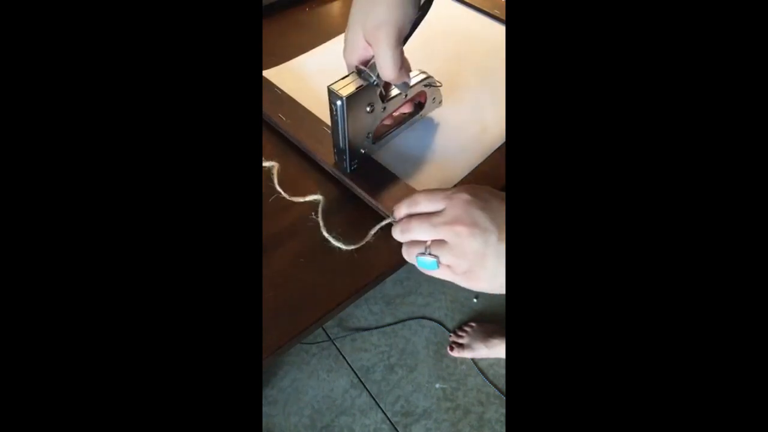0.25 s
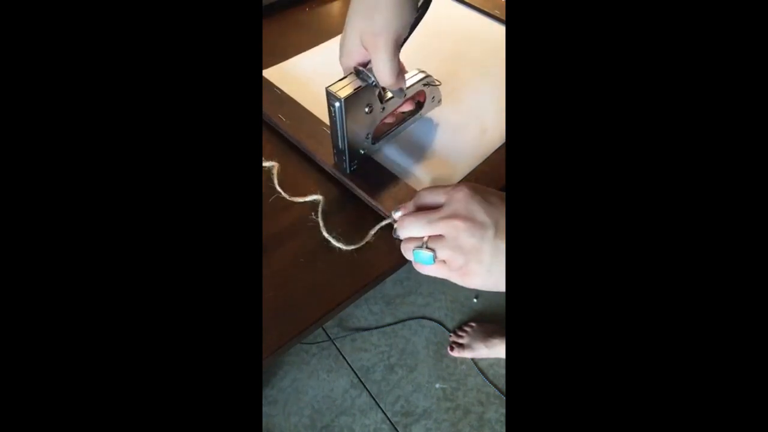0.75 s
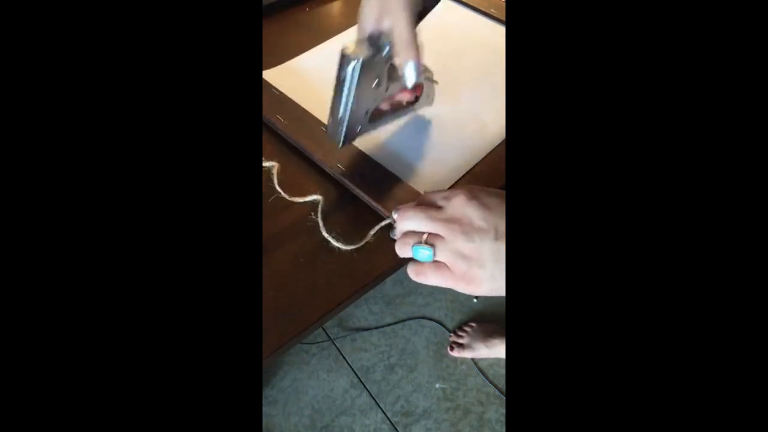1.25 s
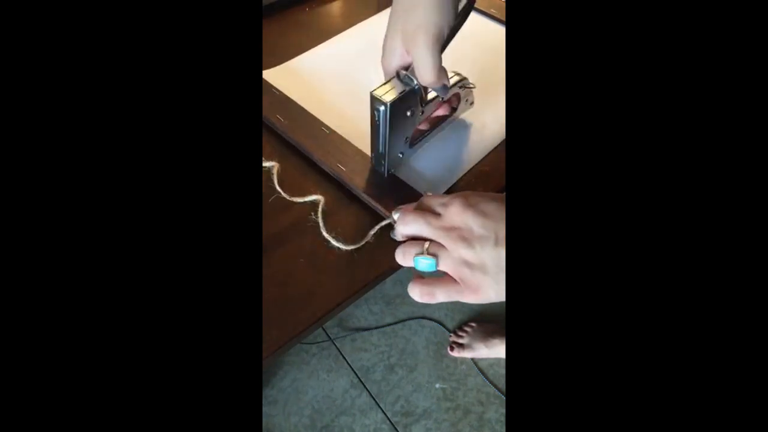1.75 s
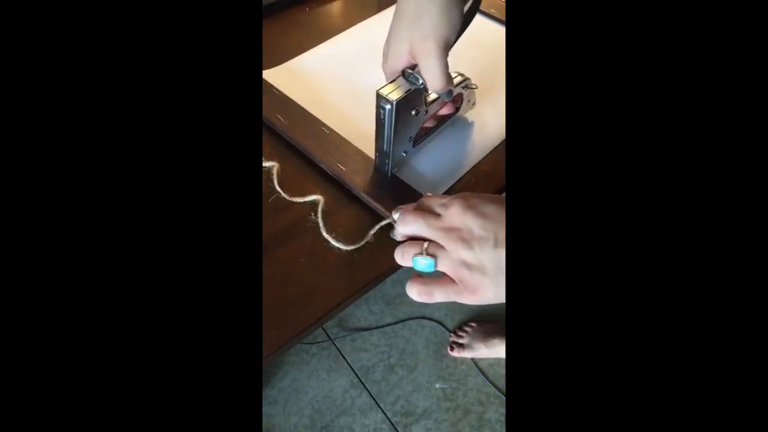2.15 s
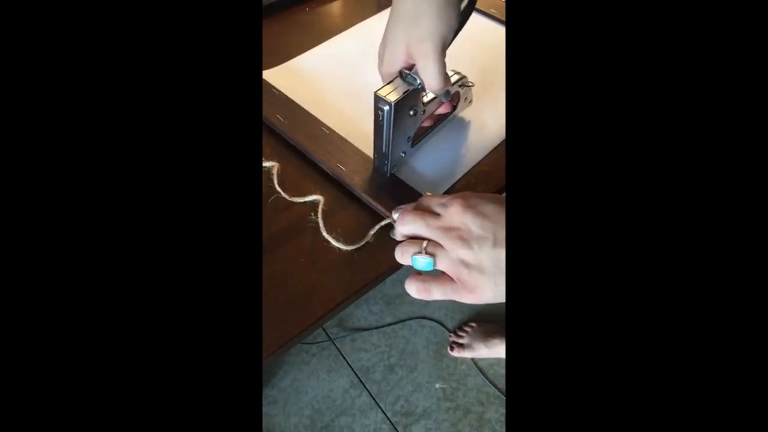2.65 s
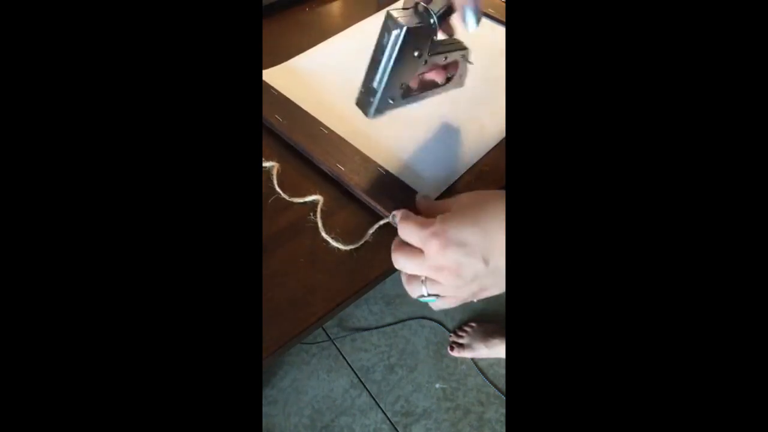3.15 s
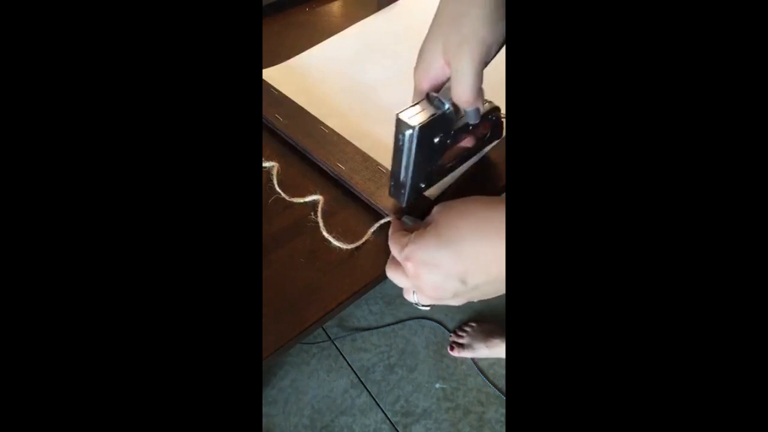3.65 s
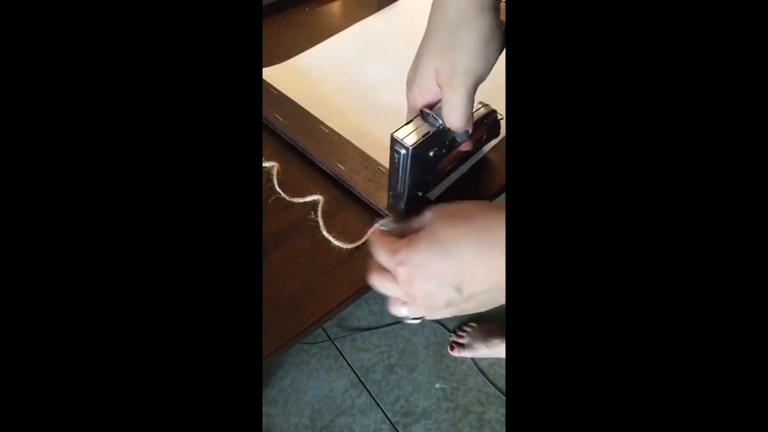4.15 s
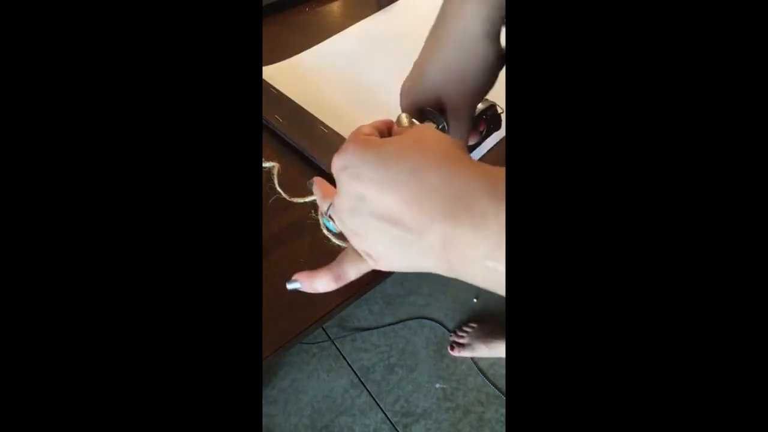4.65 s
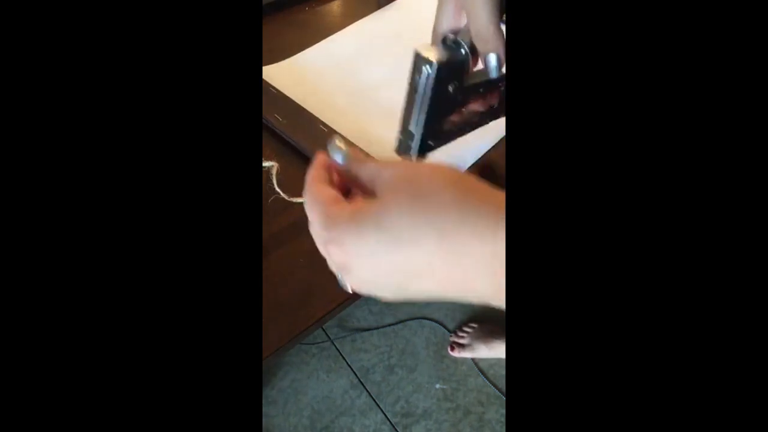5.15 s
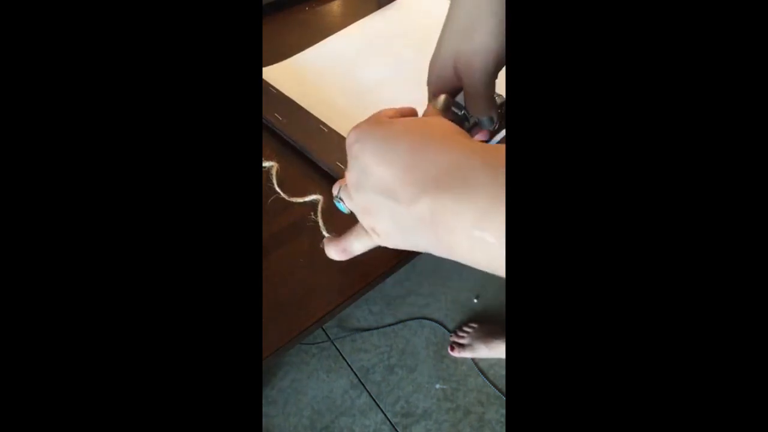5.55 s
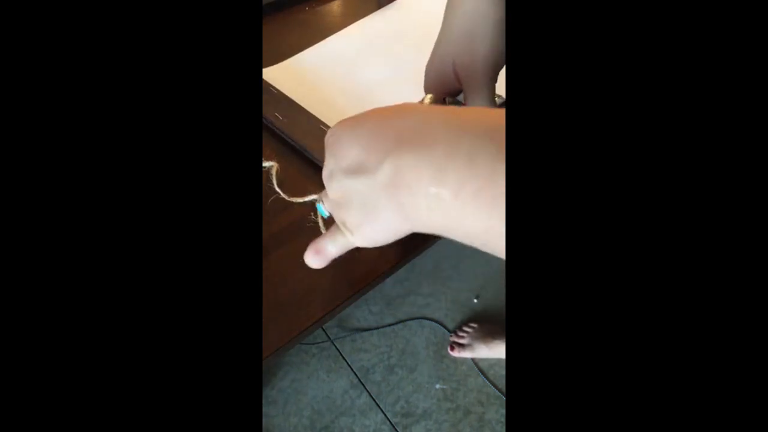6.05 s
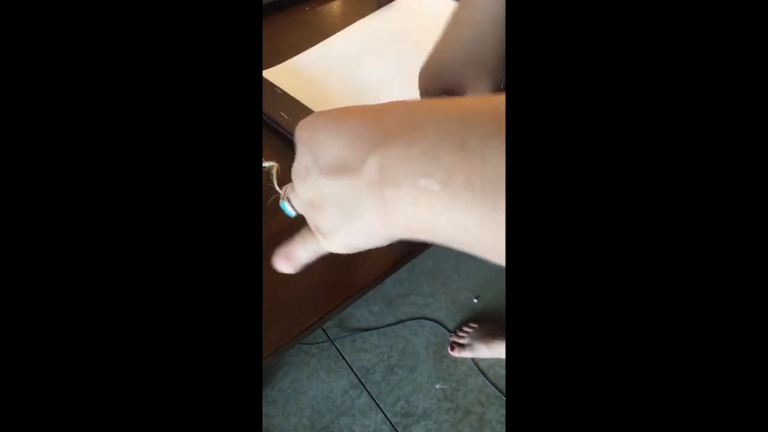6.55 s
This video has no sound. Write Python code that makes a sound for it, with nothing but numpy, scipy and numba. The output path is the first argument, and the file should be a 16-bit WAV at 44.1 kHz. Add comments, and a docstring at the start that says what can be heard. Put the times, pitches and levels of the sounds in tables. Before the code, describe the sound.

Close up in a quiet room, a squeezed staple gun ticks twice, then cracks a staple into a wooden frame, its lever clacking back afterwards. This happens three times, about two seconds apart, with soft rubs and light nose taps between. The last shot thuds heavily through the table. A short room echo follows each, over faint motor drone and passing traffic outside. A phone microphone dips after the loud shots.

```python
"""Staple gun fired three times into a wooden frame

A hand squeezes the gun: the lever ticks twice before each shot and clacks back after it.
Steel contacts are chattering noise bursts plus body modes; knocks ring the wood, the table thuds.
Spring twangs, rubs, faint treble ticks, a diffuse room echo and a coloured echo tail join them.
Outside, a motor drones as swelling harmonics over noise: traffic rush and still house air.
The close phone turns its gain down after loud sound.
"""
import sys
import numpy as np
from scipy import signal
from scipy.fft import rfft, irfft
from scipy.io import wavfile
from scipy.ndimage import uniform_filter1d
from numba import njit

SR = 44100
rng = np.random.default_rng(int(sys.argv[2]) if len(sys.argv) > 2 else 0)


def master_out(mix):
    """Clip the mix to full scale and print it as 16-bit PCM to the path in sys.argv[1]."""
    frames = np.transpose(np.atleast_2d(mix))
    ceiling = np.clip(frames, -1, 1)
    pcm = np.round(ceiling * 32767).astype(np.int16)
    wavfile.write(sys.argv[1], SR, pcm)


N = 300321
T = np.arange(N) / SR


def undb(db):
    """Gain from dB."""
    return 10 ** (np.asarray(db) / 20)


def decay(u_s, t60_s):
    """Exponential amplitude decay, 60 dB down at t60_s."""
    return np.exp(-np.log(1000) * u_s / t60_s)


def band(x, lo_hz, hi_hz):
    """Butterworth band-pass."""
    sos = signal.butter(2, [lo_hz, min(hi_hz, .45 * SR)], "band", fs=SR, output="sos")
    return signal.sosfilt(sos, x)


def ring(x, modes):
    """Sum of decaying resonances, each scaled so that a burst of noise keeps its size."""
    out = 0
    for hz, db, t60_s in modes:
        pole = np.exp(2j * np.pi * hz / SR - np.log(1000) / (t60_s * SR))
        gain = undb(db) * np.sqrt(1 - abs(pole) ** 2)
        out = out + gain * signal.lfilter([1], [1, -pole], x).imag
    return out


def walk(rate_hz):
    """Random levels held 1 / rate_hz and slewed twice; spread near 1."""
    hold = int(SR / rate_hz)
    steps = np.repeat(rng.standard_normal(N // hold + 1), hold)
    return 1.3 * uniform_filter1d(uniform_filter1d(steps, hold), hold)[:N]


def contact(kind, start_s, mid_db, hold_ms, extra_treble_db=0):
    """One steel contact: band levels and frame knock follow from its kind and strength."""
    low_db, treble_db, knock_db, rise_ms, top_db = kind
    high_db = mid_db + treble_db + extra_treble_db
    return (start_s, mid_db + low_db, mid_db, high_db, high_db + top_db,
            rise_ms, hold_ms, mid_db + knock_db)


def rattle(start_s, rise_ms, hold_ms):
    """Envelope of steel parts chattering together: exponential rise, then a rounded fall."""
    u_ms = (T - start_s) * 1000
    return np.exp(np.where(u_ms < 0, u_ms / rise_ms, -(np.minimum(u_ms / hold_ms, 8)) ** 2))


def steel(hits):
    """Colliding steel: a broad noise crack in four bands plus the ring of the gun body."""
    # gun body modes: pitch_hz, level_db, t60_s
    body_modes = [(1986, -7, .016), (2445, -3, 0.013), (3034, -7.5, 0.015), (3540, -8.5, 0.02),
                  (4504, -1.5, 0.0053), (5880, -8, .014), (9612, -2.5, 0.002), (11600, -2, 0.0051),
                  (3290, -18, .2), (3390, -18.5, .16), (4090, -17, .18), (4410, -17.5, .2),
                  (4640, -18.5, .16)]
    ring_db = -11
    # hits: start_s, low_db, mid_db, high_db, top_db, rise_ms, hold_ms
    low, mid, high, top = sum(np.outer(undb(hit[1:5]), rattle(hit[0], *hit[5:])) for hit in hits)
    contacts = rng.standard_normal((3, N)) * undb(2.3 * walk(900))
    crack = 3 * band(low * contacts[0], 1250, 2500)
    crack = crack + 2.3 * band(band(mid * contacts[1], 2300, 5400), 2300, 5400)
    crack = crack + 1.8 * band(high * contacts[2], 5200, 9500)
    crack = crack + 1.6 * band(top * contacts[2], 9500, 14000)
    return crack + undb(ring_db) * ring(crack, body_modes)


def wood(knocks, thuds):
    """Short smooth pushes ring the frame; the table swings as a decaying sine gliding down."""
    # frame modes: pitch_hz, level_db, t60_s
    frame_modes = [(140, -15, .08), (275, -5, 0.045), (374, -11, 0.051), (518.5, -8.5, .07),
                   (750, -9.5, .06), (980, -9, 0.029)]
    push_ms = .9
    thud_t60_s, thud_lag_ms, glide_rad, glide_s = .095, 2., 3.4, .0065

    push = np.zeros(N)
    for start_s, db in knocks:
        push[int(start_s * SR)] += undb(db)
    size = int(push_ms * SR / 1000) + 2
    smooth_push = signal.lfilter(np.hanning(size) / size, [1], push)
    out = ring(smooth_push * 60, frame_modes)

    for start_s, db, hz in thuds:
        u = np.maximum(T - start_s - thud_lag_ms / 1000, 0)
        phase = 2 * np.pi * hz * u + glide_rad * (1 - np.exp(-u / glide_s))
        out = out - undb(db) * np.sin(phase) * decay(u, thud_t60_s)
    return out


def spring():
    """One low mode of the spring, swelling over a few cycles before it dies."""
    # drive spring as the latch slips, handle as it is set down: start_s, level_db
    twangs = [(1.568, -26), (3.417, -27.5), (5.292, -18.5), (5.527, -29.5), (5.649, -25.5), (6.118, -41.5)]
    pitch_hz, t60_s, swell_s = 984, 0.046, 0.0019
    out = 0
    for start_s, db in twangs:
        u = np.maximum(T - start_s, 0)
        envelope = (1 - np.exp(-u / swell_s)) * decay(u, t60_s)
        out = out + undb(db) * envelope * np.sin(2 * np.pi * pitch_hz * u)
    return out


def rubs_and_ticks():
    """Rubs and faint treble ticks: short swells of grit with one bright band each."""
    # rubs and ticks: middle_s, length_ms, level_db, bright_hz
    swells = [(1.11, 22, -75, 8000), (1.344, 24.7, -72, 8000), (1.54, 123, -54.5, 3500),
              (2.699, 100, -53.5, 6100), (3.385, 84, -55, 3300), (3.935, 78, -60, 3700),
              (5.225, 80, -61, 3500), (6.47, 39, -72, 8000)]
    treble_db, bright_db = -9.5, -4.5  # against the broad grit
    grit = rng.standard_normal(N) * undb(3.9 * walk(140))
    broad = band(band(grit, 2200, 8000), 2200, 8000) + undb(treble_db) * band(grit, 6300, 11000)
    out = 0
    for middle_s, length_ms, db, hz in swells:
        swell = np.cos(np.pi * np.clip((T - middle_s) * 1000 / length_ms, -.5, .5)).clip(0)
        bright = band(grit, hz * .93, hz * 1.07)
        out = out + swell * undb(db) * (2 * broad + 5 * undb(bright_db) * bright)
    return out


def room(x):
    """Diffuse echo: each narrow band stores received energy and lets it fade, fast then slowly."""
    # echo by band, late part from the rest of the house: pitch_hz, early_t60_s, early_db, late_db
    echo = [(200, .25, -23, -42.5), (580, 0.15, -5.5, -24.5), (1510, 0.35, -10, -26.5),
            (3500, 0.26, -17, -21.5), (6950, 0.22, -16, -26), (14000, .25, -16, -28)]
    rise_ms, late_t60_s = 6., 0.68
    hz, *columns = np.transpose(echo)
    rise = np.exp(-1000 / (rise_ms * SR))
    late_fade = 10 ** (-6 / (late_t60_s * SR))
    out = 0
    for centre_hz in 160 * 2 ** np.arange(0, 6.7, 1 / 5):
        edges_hz = centre_hz / 2 ** (1 / 10), centre_hz * 2 ** (1 / 10)
        t60_s, early_db, late_db = (np.interp(np.log(centre_hz), np.log(hz), c) for c in columns)
        early_fade = 10 ** (-6 / (t60_s * SR))
        arriving = signal.lfilter([1 - rise], [1, -rise], band(x, *edges_hz) ** 2)
        energy = 0
        for db, fade in ((early_db, early_fade), (late_db, late_fade)):
            energy = energy + undb(2 * db) * signal.lfilter([1 - fade], [1, -fade], arriving)
        scatter = band(rng.standard_normal(N), *edges_hz)
        out = out + np.sqrt(np.abs(energy)) * scatter / np.std(scatter)
    return out


def coloured_tail(x):
    """The room's fading tail, tinted by each sound: convolution with decaying noise."""
    level_db, t60_s = -21.5, 0.29
    noise = band(rng.standard_normal(SR // 2), 1200, 10000)
    tail = noise * decay(T[:SR // 2], t60_s)
    return undb(level_db) * signal.fftconvolve(x, tail / np.sqrt(np.sum(tail ** 2)))[:N]


def coloured(points, flicker_db):
    """Noise of a given spectrum, rms 1 between 500 and 2500 Hz before its level flickers."""
    hz, db = np.transpose(points)
    f = np.maximum(np.arange(N // 2 + 1) * SR / N, 1)
    spectrum = rfft(rng.standard_normal(N)) * undb(np.interp(np.log(f), np.log(hz), db))
    mid = irfft(spectrum * ((f > 500) & (f < 2500)), N)
    return irfft(spectrum, N) / np.std(mid) * undb(flicker_db * walk(9))


def outside():
    """Motor harmonics swell in turn and waver; traffic noise swells over the still house air."""
    # motor and traffic course: start_s, firing_rate_hz, motor_db, rush_db
    course = [(0.0, 56.16, -10.5, -63), (0.41, 54, -4, -61), (0.69, 54.7, -12, -62.5),
              (0.96, 54.9, 0.3, -61), (1.5, 55.17, 5.5, -58.5), (2.3, 56.08, 1.5, -56),
              (2.6, 55.55, -0.6, -55.5), (2.85, 56.08, -2.7, -50.5), (3.2, 55.8, -0.3, -46),
              (3.6, 55.83, 0, -47), (4.07, 55.8, 3, -48), (4.58, 55.02, 1.9, -54),
              (5.2, 54.92, -0.9, -56.5), (5.75, 54.53, -20.5, -59), (6.05, 54.4, -6, -52.5),
              (6.35, 53.4, -11, -56.5), (6.8, 53.6, -7.5, -60.5)]
    # firing-rate multiples, each strongest for a while:
    # peak_db, from_s, until_s, rise_db_per_s, fall_db_per_s, rest_db
    multiples = [(-45.5, 3.9, 17, 6, 3, -61.5), (-39, 2.1, 4.9, 32.5, 13.5, -46),
                 (-46.5, 2.5, 4.05, 36, 40, -58.5), (-36.5, 2.9, 4.01, 16.5, 34, -50),
                 (-49, 2.1, 2.7, 28.5, 28, -59)]
    # relative spectra: pitch_hz, density_db_per_hz
    rush_spectrum = [(26, -25), (45, -22.5), (104, -3), (129, -6), (162, -9.5), (222, -6.5), (411, -15.5),
                     (465, -22.5), (760, -19.5), (1100, -22), (1550, -20), (1890, -23.5), (3080, -34.5),
                     (13500, -65.5), (16000, -94.5)]
    air_spectrum = [(18, -39), (30, 2.5), (115, -2), (384, -6.5), (461, -3.5), (760, -19.5), (913, -10.5),
                    (1630, -21.5), (2980, -29.5), (13700, -47.5), (16000, -55)]
    # tyre roar: pitch_hz, width_hz, level_db
    roar_peaks = [(614, 210, -10.5), (1197, 500, -5), (2004, 840, -5.5), (2960, 2000, -14)]
    air_db, low_cut_hz = -60.5, 44

    start_s, *columns = np.transpose(course)
    firing_hz, motor_db, rush_db = (np.interp(T, start_s, c) for c in columns)
    phase = 2 * np.pi * np.cumsum(firing_hz) / SR
    drone = 0
    for k, (db, from_s, until_s, rise, fall, rest_db) in enumerate(multiples, start=1):
        swell_db = db + np.minimum(rise * (T - from_s), fall * (until_s - T))
        swell_db = np.clip(swell_db, min(rest_db, db), db)
        waver_db = 2.2 * walk(4) + 0.75 * walk(12)
        drone = drone + undb(swell_db + waver_db) * np.sin(k * phase + 0.11 * walk(35))

    rush = undb(rush_db) * coloured(rush_spectrum, flicker_db=0.98)
    roar = 0
    for hz, width_hz, db in roar_peaks:
        peak = band(rush, hz - width_hz / 2, hz + width_hz / 2)
        roar = roar + undb(db + 2.3 * walk(15)) * peak
    air = undb(air_db) * coloured(air_spectrum, flicker_db=1.33)
    mix = np.sqrt(2) * undb(motor_db) * drone + rush + roar + air
    return signal.sosfilt(signal.butter(4, low_cut_hz, "high", fs=SR, output="sos"), mix)


def scene():
    """Gun, wood and hands in the room, the street behind; the same signal in both channels."""
    # shots: start_s, low_db, mid_db, treble_db, rattle_ms, thud_db, thud_hz, knock_db,
    # rebound_db, rebound_rattle_ms
    shots = [(1.6078, -12, 2, -0.5, 7.9, -4, 51, -13, -9, 6.1),
             (3.4526, -0.5, 4.5, 4, 4.2, -21.5, 59.5, -10.5, -6, 1.5),
             (5.3214, -5.5, 5.5, 0.5, 8.2, 12.5, 44.7, 0, -6.5, 14)]
    # lever and latch clicks: start_s, mid_db, extra_treble_db, rattle_ms
    lever_clicks = [(1.566, -32.5, 9, 4), (1.585, -20.5, -0.2, 5.9), (1.787, -60, 25.5, 6.37),
                    (1.822, -20.5, 1.5, 8.4), (3.416, -37.5, 16.5, 2.2), (3.4312, -23, 10.5, 3.1),
                    (3.539, -27.5, 0, 2.8), (3.612, -37, 5, 5), (3.6556, -21, 3.5, 8),
                    (5.262, -31.5, 7, 2.99), (5.28, -17, -5, 1.9), (5.515, -38.5, 4, 6.2),
                    (5.599, -24.5, -2, 3.6), (5.6028, -15.5, 2, 3.8)]
    # duller taps of the gun's nose on the wood: start_s, mid_db, rattle_ms, extra_treble_db
    nose_taps = [(2.089, -51.5, 3.6, -5), (2.287, -19.5, 2.8, -0.5), (3.787, -44.5, 4.3, 2.5),
                 (3.814, -43.5, 3.2, 0), (3.969, -50.5, 6.7, -6), (4.4478, -31.5, 1.7, -1.5),
                 (4.691, -61, 2.5, 1), (5.296, -33.5, 8, .1), (6.119, -35.5, 2.4, -22)]
    # soft bumps of the hand on the frame: start_s, level_db
    hand_bumps = [(5.261, -35.5), (5.279, -35.5), (5.298, -27), (5.526, -37), (5.649, -37), (5.66, -38)]
    # contact kinds: low_db, treble_db, knock_db (against mids), rise_ms, top_db (against treble)
    rebound_kind = (-1, -8, -2, 3.4, -0.9)
    lever_kind = (-10, -1.5, -30, 1.54, 0.5)
    tap_kind = (-8.5, -8, -10, 1.75, -19.5)
    shot_top_db, shot_rise_ms, rebound_lag_ms = -5.5, .4, 12.5

    hits = []
    for (start_s, low_db, mid_db, treble_db, rattle_ms, _, _, knock_db,
         rebound_db, rebound_ms) in shots:
        hits.append((start_s, low_db, mid_db, treble_db, treble_db + shot_top_db,
                     shot_rise_ms, rattle_ms, knock_db))
        hits.append(contact(rebound_kind, start_s + rebound_lag_ms / 1000, rebound_db, rebound_ms))
    for start_s, mid_db, extra_treble_db, rattle_ms in lever_clicks:
        hits.append(contact(lever_kind, start_s, mid_db, rattle_ms, extra_treble_db))
    hits += [contact(tap_kind, *tap) for tap in nose_taps]
    hits = np.array(hits)

    knocks = np.vstack([hits[:, [0, 7]], hand_bumps])
    thuds = np.array(shots)[:, [0, 5, 6]]
    near = steel(hits[:, :7]) + wood(knocks, thuds) + spring() + rubs_and_ticks()
    return np.tile(near + room(near) + coloured_tail(near) + outside(), (2, 1))


@njit
def follow(x, attack, release):
    """Envelope that rises quickly and sinks slowly."""
    out, level = np.empty(len(x)), 1e-4
    for i in range(len(x)):
        level += (x[i] - level) * (attack if x[i] > level else release)
        out[i] = level
    return out


def record(dry):
    """Phone: cuts deep bass, lowers its gain after loud sound, rounds peaks, cuts the top."""
    low_cut_hz, top_hz, headroom_db = 23.83, 16150, -2.5
    threshold_db, ratio, attack_ms, release_ms = -25.5, 1.64, 18, 436
    x = signal.sosfilt(signal.butter(3, low_cut_hz, "high", fs=SR, output="sos"), dry)
    loudness = follow(np.abs(dry[0]), 1000 / (attack_ms * SR), 1000 / (release_ms * SR))
    x = x * np.minimum(undb(threshold_db) / loudness, 1) ** (1 - 1 / ratio)
    x = undb(headroom_db) * np.tanh(x / undb(headroom_db))
    x = signal.sosfilt(signal.ellip(10, .2, 80, top_hz, fs=SR, output="sos"), x)
    return np.clip(x, -1, 1)


dry = scene()
out = record(dry)
master_out(out)
```